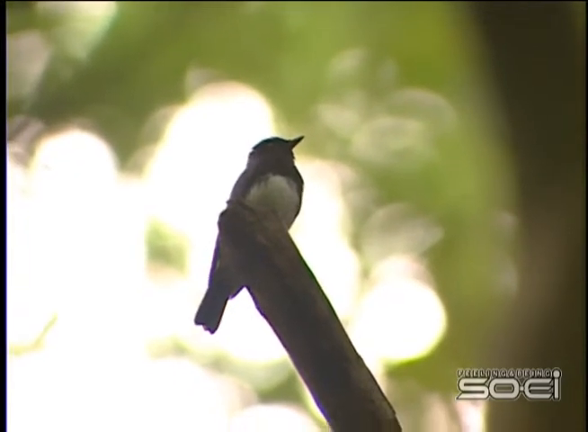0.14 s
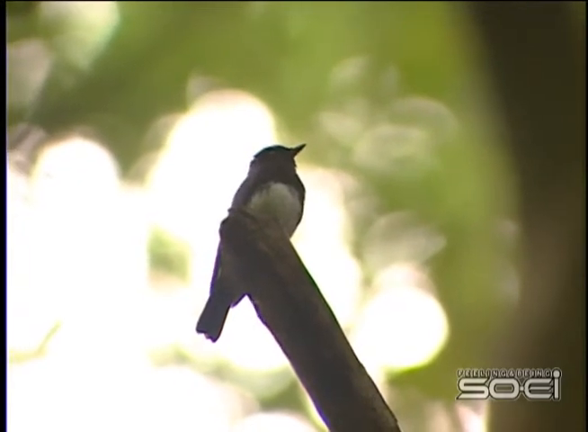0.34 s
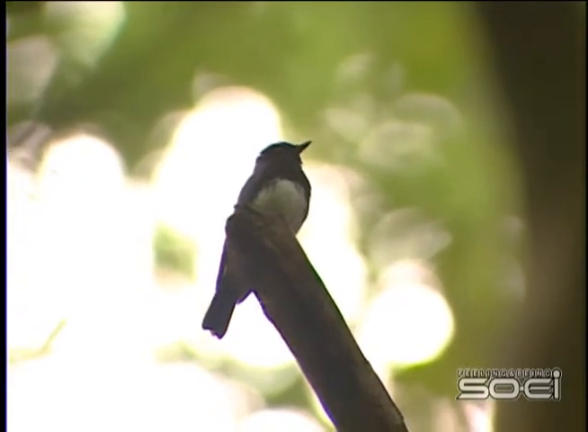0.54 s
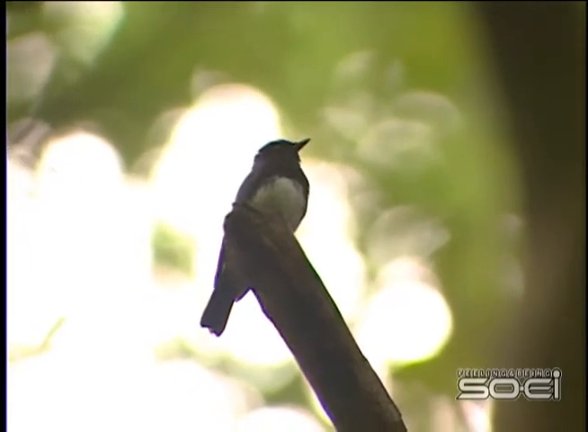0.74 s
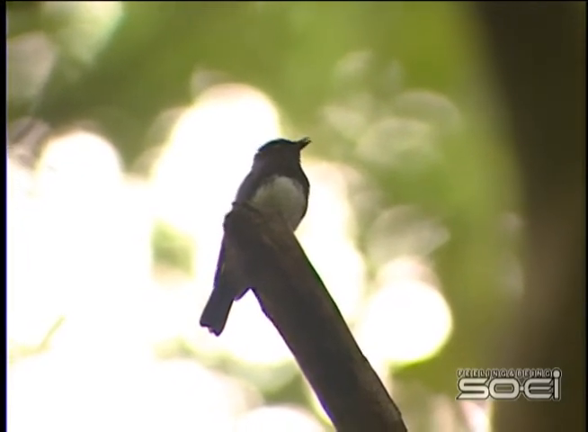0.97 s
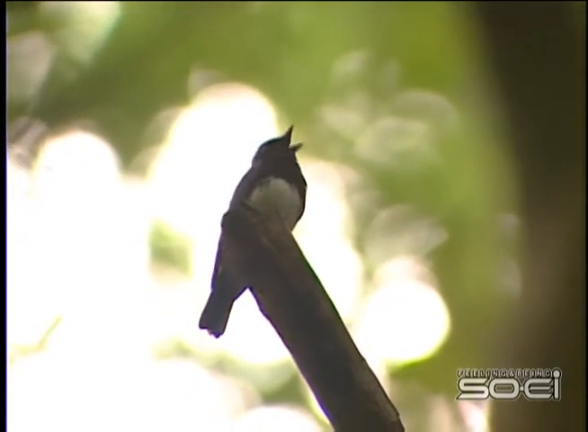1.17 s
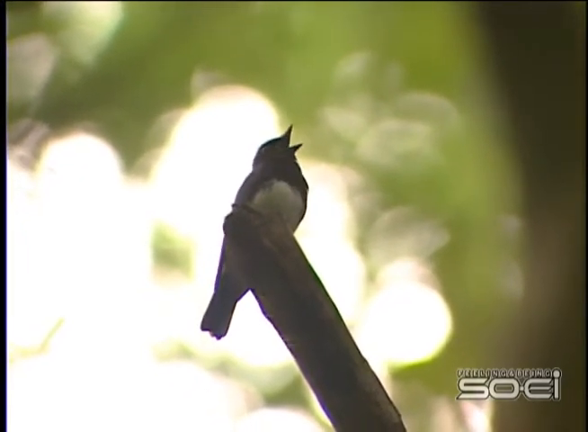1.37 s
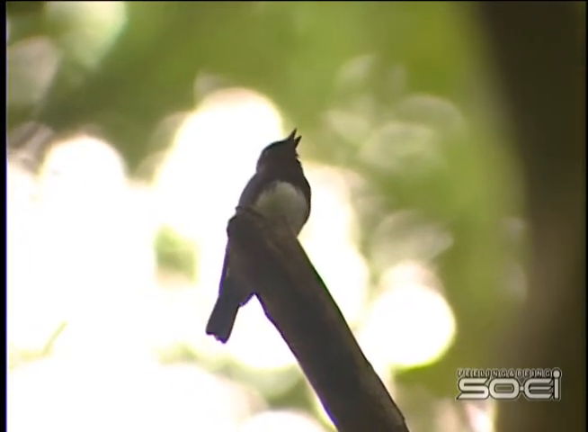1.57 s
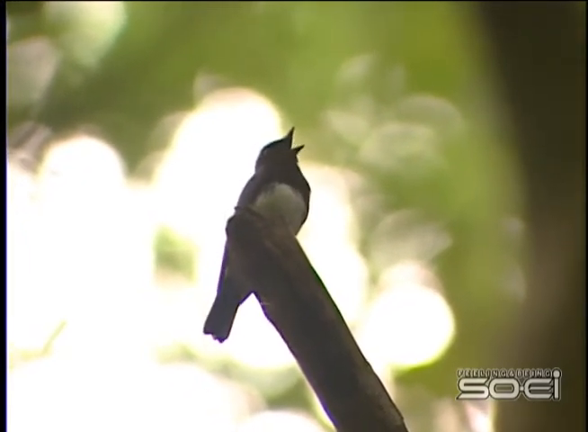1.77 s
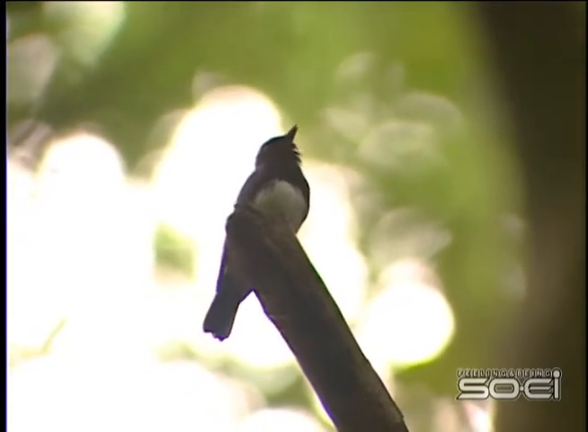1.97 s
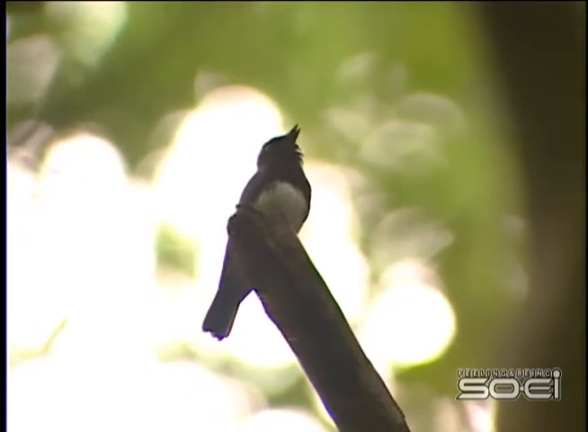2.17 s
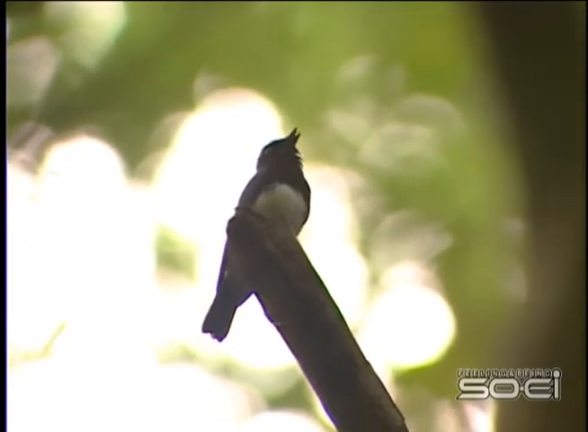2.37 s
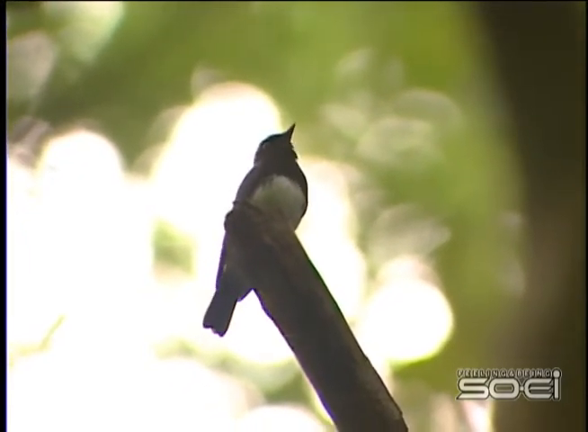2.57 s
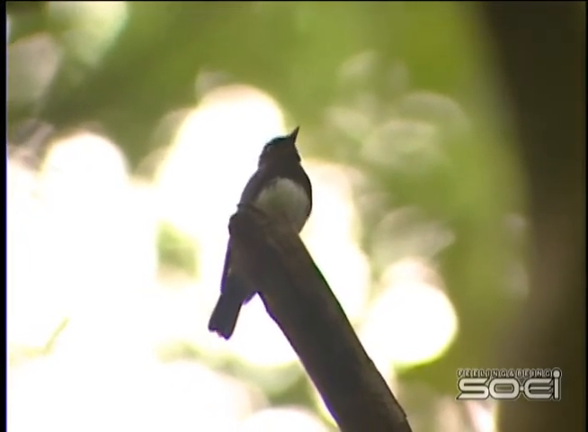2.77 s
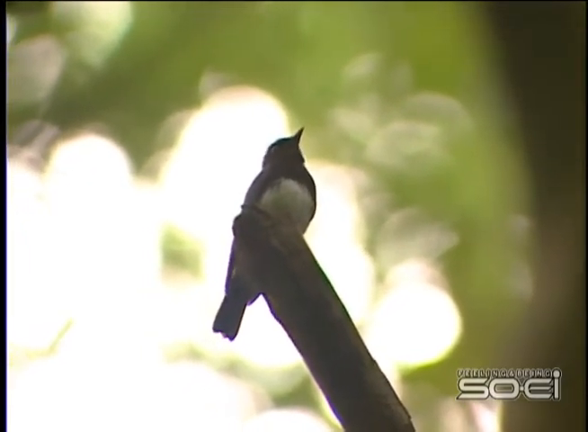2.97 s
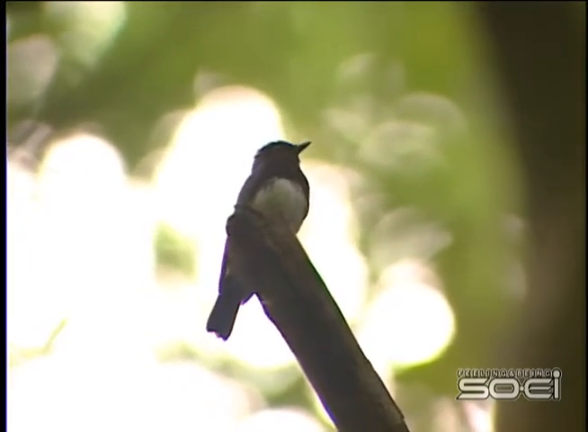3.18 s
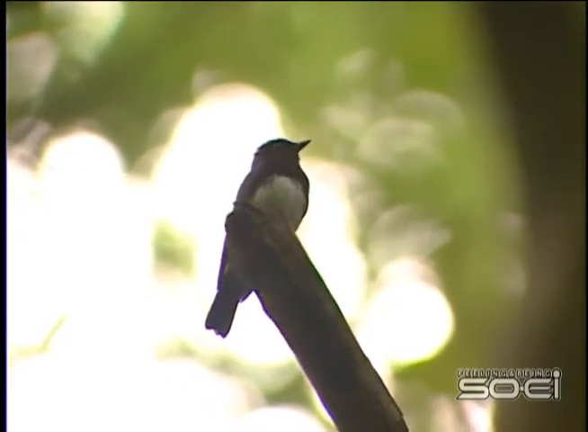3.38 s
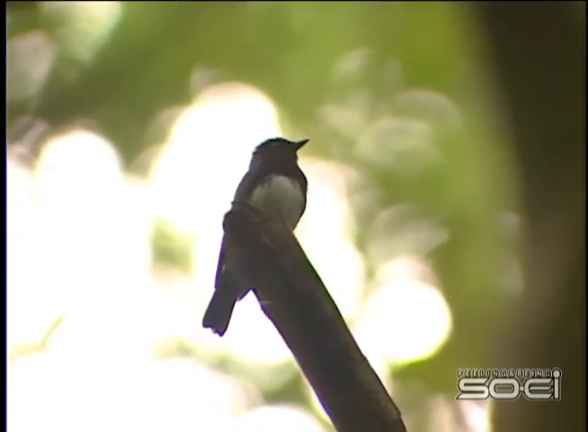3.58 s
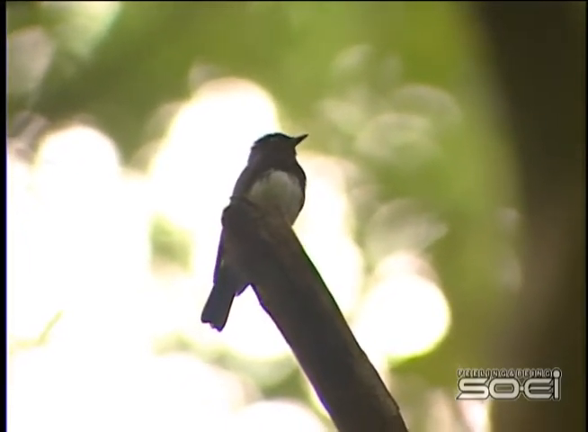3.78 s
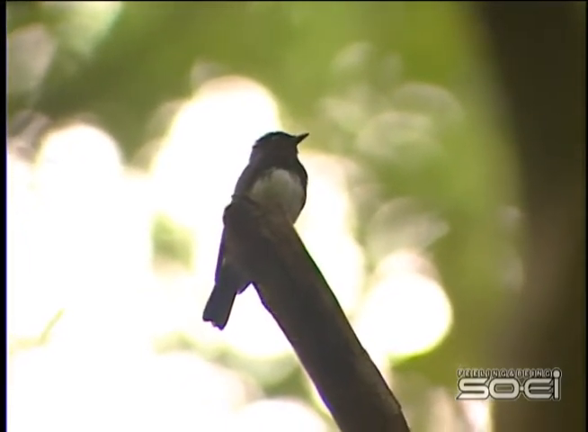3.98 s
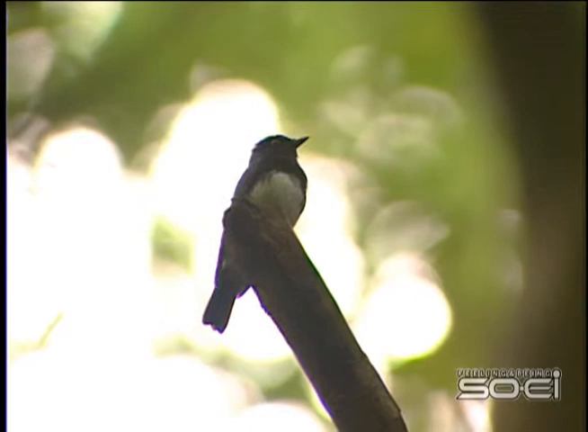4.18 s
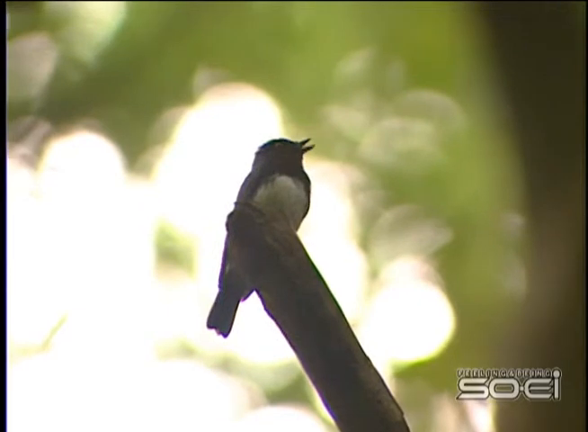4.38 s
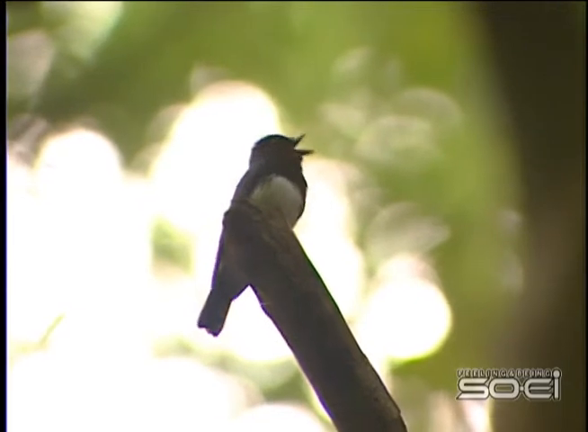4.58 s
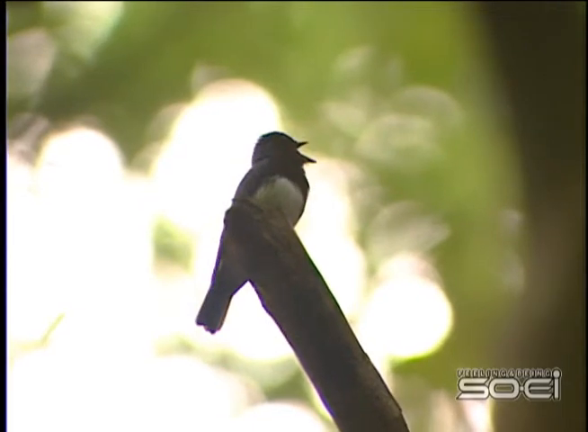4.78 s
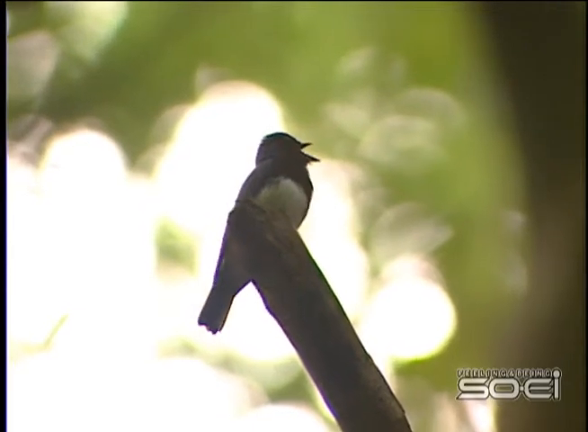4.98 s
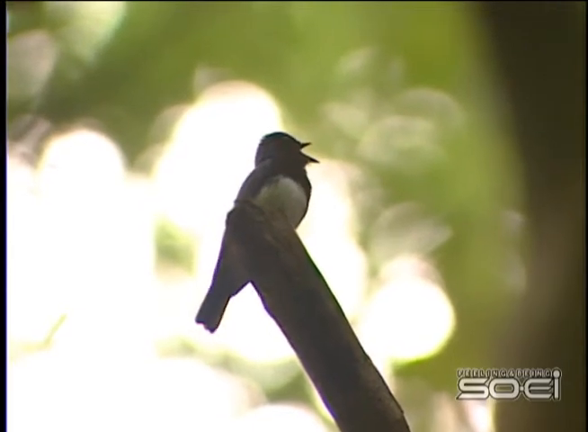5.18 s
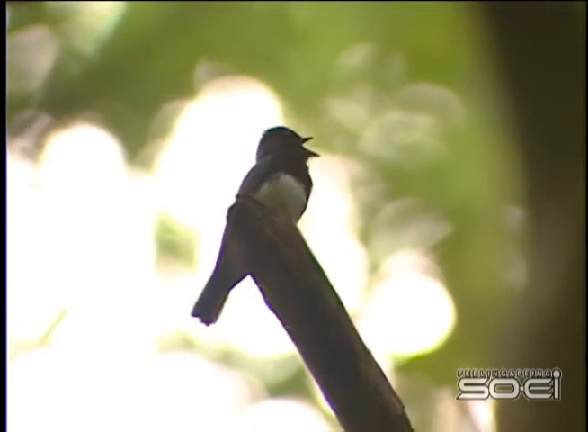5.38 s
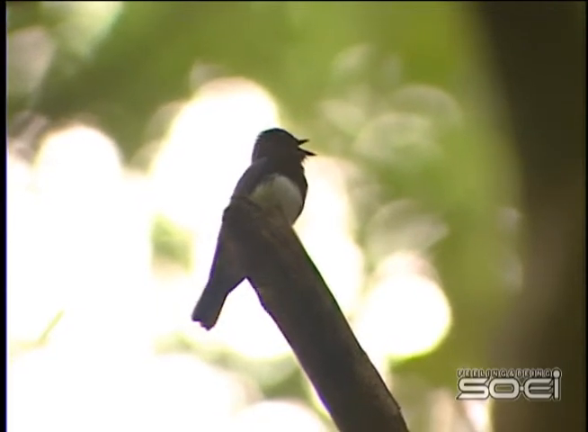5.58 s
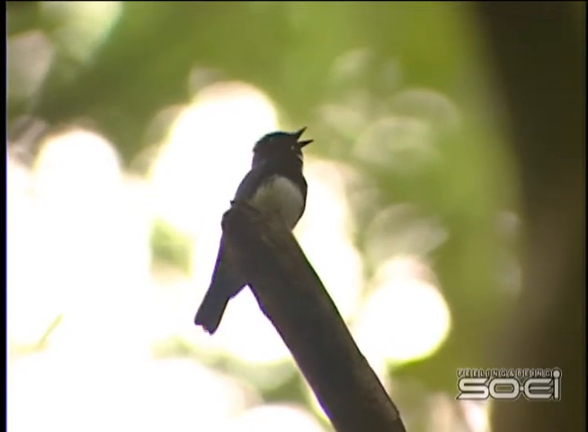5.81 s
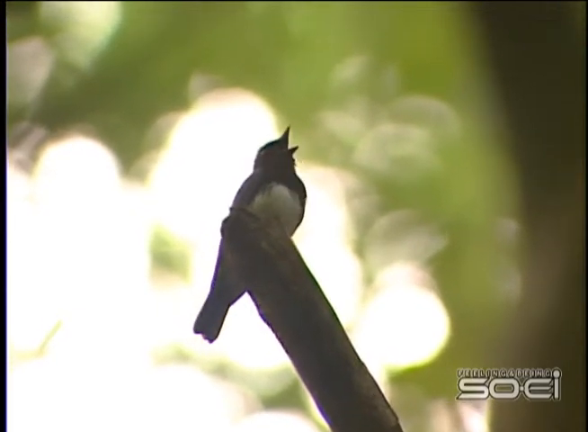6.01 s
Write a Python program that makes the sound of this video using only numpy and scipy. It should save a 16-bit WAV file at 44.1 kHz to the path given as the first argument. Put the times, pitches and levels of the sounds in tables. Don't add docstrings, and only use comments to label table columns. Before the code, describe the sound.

A small songbird sings rising slurs, a trilled warble and buzzy falling whistles in an echoing forest, over rumbling microphone thumps and soft frog clucks.

```python
import sys
import numpy as np
from scipy import signal
from scipy.fft import rfft, irfft
from scipy.io import wavfile
from scipy.ndimage import uniform_filter1d

SR = 44100
rng = np.random.default_rng(int(sys.argv[2]) if len(sys.argv) > 2 else 0)


def decibels_to_gain(level_db):
    exponent = np.asarray(level_db, float) / 20
    return 10 ** exponent


def file_out(sig):
    cols = np.atleast_2d(sig).T
    lim = np.clip(cols, -1, 1)
    pcm = np.round(lim * 32767).astype(np.int16)
    wavfile.write(sys.argv[1], SR, pcm)


N = 266672

# start_s, climb_s, foot_hz, top_hz, level_db
SLURS = [
    (1.228, 0.1, 3428, 4794, -39.5),
    (1.408, 0.066, 3628, 5286, -35.5),
    (1.558, .066, 3708, 5266, -38),
    (1.774, 0.17, 3150, 5207, -36),
]
# start_s, length_s, foot_hz, top_hz, level_db
FLICKS = [
    (1.347, .03, 3658, 5100, -32.5),
    (1.504, .033, 3795, 5170, -36),
    (1.648, 0.0206, 4680, 5315, -39),
    (2.081, 0.0266, 2346, 2783, -41),
]
# start_s, length_s, from_hz, to_hz, level_db
CHIRPS = [
    (1.327, 0.011, 4700, 3300, -38),
    (1.329, 0.015, 8000, 4830, -53),
    (1.487, 0.012, 5070, 3200, -39),
    (2.072, .015, 2750, 3760, -40.5),
    (2.092, 0.0131, 3700, 2650, -38.5),
    (2.113, 0.015, 3650, 2500, -54),
    (2.299, 0.027, 3296, 3244, -36),
]
# start_s, length_s, from_hz, to_hz, climax_level_db
WARBLE = [
    (2.175, 0.14, 2900, 3300, -33.5),
    (2.328, .172, 3200, 3100, -35),
    (2.27, 0.13, 2550, 2450, -53),
]
# start_s, pitch_hz, level_db
LEAD_IN = [
    (4.584, 4500, -53),
    (4.61, 4156, -35),
    (4.648, 3920, -33),
    (4.654, 3952, -39),
    (4.664, 4007, -29),
    (4.69, 4214, -31.5),
    (4.714, 4160, -38),
    (4.726, 3400, -53),
]
# start_s, length_s, pitch_hz, level_db, trill_depth_hz
WHISTLES = [
    (4.812, 0.16, 3790, -30, 114),
    (5.087, 0.19, 3752, -28.5, 115),
    (5.377, .205, 3628, -29.5, 130),
    (5.688, .203, 3535, -30.5, 107),
]
OVERTONES_DB = -32.5, -40, -55
# pitch_hz, gain_db
BEAK = [(5000, 8.5), (7500, -12), (9000, -6), (10500, 0), (12000, 7), (13500, 6), (16000, 2)]
# band_hz, t60_s, strength_db
FOREST = [(700, 0.98, 5.5), (2500, 0.93, 0), (3200, 0.83, -0.93), (3950, 0.94, -0.1), (5500, 0.97, 0.2),
          (8800, 0.88, 1), (13900, 0.24, 2.5)]
# start_s, peak_db, pitch_hz
CLUCKS = [(0.476, -66.5, 1080), (0.893, -57, 1040), (1.147, -53, 1024), (1.193, -51, 916),
          (1.277, -59, 970), (1.783, -55, 1320), (2.41, -50, 1090), (2.578, -52, 970), (2.739, -48.5, 897),
          (2.82, -45.5, 900), (2.882, -57, 960), (3.111, -54, 890), (3.286, -52.5, 894), (3.366, -62, 1090),
          (3.705, -57, 1075), (3.898, -56, 905), (3.965, -46, 870), (4.102, -75, 824), (4.228, -58, 1150),
          (4.251, -60, 1080), (4.477, -61, 1020), (4.531, -50, 1070), (4.762, -54, 1010), (5.169, -61, 799),
          (5.235, -47, 776), (5.518, -55, 940), (5.756, -54, 1090), (5.788, -54, 870), (5.886, -53, 840),
          (6.005, -53, 830)]
# band_hz, level_db_per_hz
LEAVES = [(120, -7), (200, 0.5), (304, -5.5), (334, -5.5), (745, -10.5), (895, -8), (1200, -10.5),
          (1630, -8.5), (2530, -12), (4980, -12), (14900, -25.5), (15800, -32)]
# time_s, level_db
SHAKE = [(0, -62), (.15, -60), (.45, -53), (.75, -47), (1.1, -39), (1.5, -38), (1.85, -45), (2.35, -41.5),
         (2.75, -42.5), (3.4, -45), (3.75, -38.5), (4.0, -44), (4.3, -48.5), (4.55, -40), (4.8, -47.5),
         (5.5, -45), (6.05, -41)]
# peak_s, deep_db, upper_db, s to die by 20 dB
LURCHES = [(0.0, -48, -59, 0.3), (.53, -49.5, -58, 0.8), (.71, -36, -58, 0.07), (.89, -34.5, -40, .15),
           (1.18, -33, -50, 0.04), (1.281, -31, -47.5, .2), (1.41, -28, -50, 0.12), (1.579, -31, -53, 0.18),
           (2.0, -23.5, -52, 0.2), (2.236, -42, -34.5, 0.2), (2.259, -25.5, -44, 0.27),
           (2.461, -33.5, -56, 0.03), (2.542, -38, -49.5, 0.26), (3.1, -40.5, -51, 0.25),
           (3.15, -47, -56, 0.35), (3.43, -55, -53, 0.3), (3.57, -35, -51, 0.05), (3.67, -32, -55, 0.14),
           (3.909, -36, -56, 0.02), (4.056, -32.5, -26.5, 0.13), (4.11, -24.5, -57, .12),
           (4.154, -40, -38.5, 0.05), (4.511, -34, -58, 0.11), (4.7, -37.5, -61, 0), (4.849, -54, -58, 0.6),
           (5.2, -41.5, -60, 0.2), (5.61, -40, -59, 0.5), (6.045, -40, -33, 2)]
# band_hz, level_db_per_hz
DEEP_RUMBLE = [(18, -5), (27, -4), (36, 6), (46, -3), (58, 1.5), (70, -11), (90, -24)]
# band_hz, level_db_per_hz
UPPER_RUMBLE = [(41, -39.5), (70, 1.5), (86, -2.5), (134, -3), (161, -18), (320, -41.5), (420, -68),
                (700, -120)]
# start_s, peak_db, ring_hz, t60_s
KNOCKS = [
    (0.54, -55, 282, 0.025),
    (0.855, -53, 215, 0.025),
    (0.893, -36, 396, 0.035),
    (0.907, -40, 202, 0.028),
    (0.92, -42, 210, 0.025),
    (1.969, -55, 205, 0.025),
    (2.218, -68, 199, 0.025),
    (4.043, -54, 202, 0.02),
    (4.152, -29, 212, 0.025),
    (6.032, -42, 206, 0.025),
]
# start_s, peak_db, ring_hz, t60_s
JOLTS = [
    (1.919, -26, 51, 0.26),
    (1.975, -22.5, 87, 0.15),
    (1.99, -19.5, 61.8, 0.27),
    (2.225, -27.5, 92, 0.22),
    (2.27, -28.5, 34.7, 0.64),
    (4.047, -26.5, 50.8, 0.23),
    (4.057, -16, 32.2, 0.31),
    (4.503, -30.5, 56, 0.47),
]
# start_s, peak_db, ring_hz, t60_s
CREAKS = [(0.542, -57, 400, 0.047), (0.574, -64, 390, 0.046), (0.608, -75, 382, 0.05),
          (0.679, -74, 382, 0.05), (0.855, -57, 490, 0.062), (0.925, -59, 382, 0.05),
          (0.969, -72, 382, 0.046), (2.22, -53, 502, 0.059), (2.282, -53.5, 486, 0.05),
          (2.314, -60, 380, 0.054), (4.037, -50, 408, 0.077), (4.623, -59, 464, 0.05)]
# start_s, peak_db, centre_hz, t60_s
TICKS = [
    (0.3451, -60, 5500.0, 0.003),
    (1.7661, -60, 5500.0, 0.003),
    (2.4603, -46, 5500.0, 0.0067),
    (3.9644, -67, 5500.0, 0.003),
    (4.103, -48, 5500.0, 0.002),
    (4.29, -60, 5500.0, 0.003),
    (5.5503, -62, 5500.0, 0.0037),
]
# start_s, peak_db, centre_hz, t60_s
SNAPS = [
    (0.5407, -55, 2330, 0.0022),
    (0.6394, -64, 2300.0, 0.003),
    (0.894, -58, 2300.0, 0.003),
    (0.9744, -69, 2300.0, 0.003),
    (3.9644, -58, 2300.0, 0.003),
    (4.1016, -58, 2300.0, 0.003),
]
# band_hz, level_db_per_hz
SELF_NOISE = [(600, -2), (3000, -13), (8000, -19.5), (12000, -6), (15700, 3)]
# band_hz, level_db_per_hz
IDLE_NOISE = [(20, -17), (100, -9.5), (300, -16.5), (1200, -21), (3000, -25), (8000, -34), (15500, -49)]


def sing(notes, trill_per_s=50, uneven=0.074, waver_hz=12, flutter_db=3.0, dip_db=1.3, thinning=0.3):
    out = np.zeros(N)
    for note in notes:
        s, pitch_hz, level_db, *depth_hz = np.transpose(note)
        at = np.arange(int(s[0] * SR), min(int(s[-1] * SR), N))
        t = at / SR
        rate = trill_per_s * (1 + uneven * drift(24.4, len(t)))
        beat = np.sin(2 * np.pi * np.cumsum(rate) / SR)
        swing_hz = np.interp(t, s, depth_hz[0]) * beat if depth_hz else 0
        hz = np.interp(t, s, pitch_hz) + swing_hz + waver_hz * drift(117.5, len(t))
        phase = 2 * np.pi * np.cumsum(hz) / SR
        effort_db = np.interp(t, s, level_db)
        edge = np.clip(np.minimum(t - s[0], s[-1] - t) / 0.002, 0, 1)
        height = np.sqrt(2) * edge * decibels_to_gain(effort_db + flutter_db * drift(84, len(t)) - dip_db * beat ** 2)
        tone = np.sin(phase)
        thin_db = -thinning * (effort_db + 32.0)
        for k, overtone_db in enumerate(OVERTONES_DB, start=2):
            gain = decibels_to_gain(overtone_db + thin_db + at_hz(BEAK, k * hz))
            tone = tone + gain * np.sin(k * phase) * (k * hz < SR / 2)
        out[at] += height * tone
    return out


def slur(s, climb, foot_hz, top_hz, db, bend=0.71, attack_s=0.014, soft_db=-16):
    t = np.linspace(0, climb, num=12)
    hz = foot_hz + (top_hz - foot_hz) * (t / climb) ** bend
    level_db = db + soft_db * np.maximum(1 - t / attack_s, 0)
    level_db += 94 * (0.11 - climb) * (t / climb - .5)
    crest = (s + climb + 0.014, top_hz - 200, level_db[-1] + 3)
    return np.r_[np.c_[s + t, hz, level_db], [crest]]


def flick(s, length, foot_hz, top_hz, db, rise=0.359, feet_db=-13.5):
    end_hz = foot_hz - 0.256 * (top_hz - foot_hz)
    return [(s, foot_hz, db + feet_db), (s + rise * length, top_hz, db), (s + length, end_hz, db + feet_db)]


def chirp(s, length, from_hz, to_hz, db, best_hz=5040, loss_db_per_khz=5.5):
    off_khz = np.abs(np.array([from_hz, to_hz]) - best_hz) / 1000
    return np.c_[[s, s + length], [from_hz, to_hz], db - loss_db_per_khz * (off_khz - off_khz.min())]


def warble(s, length, from_hz, to_hz, db, climax_s=2.319, fade_db_per_s=140, depth_hz=272):
    t = np.linspace(s, s + length, num=9)
    level_db = db - fade_db_per_s * np.abs(t - climax_s)
    return np.c_[t, np.linspace(from_hz, to_hz, num=9), level_db, depth_hz + 0 * t]


def whistle(s, length, hz, db, depth_hz, hook_s=0.014, dive_s=0.014):
    t = np.linspace(0, length - hook_s, num=12)
    u, attack = t / t[-1], np.minimum(t / 0.04, 1)
    creep_hz = hz + 1200 * t[-1] * u ** 1.7
    level_db = db - 16 * (1 - attack) ** 2 + 3 * (u - .5)
    buzz = np.c_[s + t, creep_hz, level_db, depth_hz * (2 + attack) / 3]
    hook = (s + length, creep_hz[-1] + 140.5, db + 5, 0.29 * depth_hz)
    plunge = (s + length + dive_s, 2650, db - 31, 0)
    return np.r_[buzz, [hook, plunge]]


def flycatcher():
    plain = [slur(*row) for row in SLURS] + [flick(*row) for row in FLICKS] + [chirp(*row) for row in CHIRPS]
    lead_in = [(*row, 22) for row in LEAD_IN]
    buzzy = [lead_in] + [whistle(*row) for row in WHISTLES]
    song = sing(plain)
    song += sing(buzzy, 99, uneven=0.02, waver_hz=13.0, flutter_db=2.5, dip_db=1.5, thinning=-0.24)
    song += sing([warble(*row) for row in WARBLE], 100, uneven=0.2, waver_hz=70, flutter_db=4.0, dip_db=3.5)
    return song


def forest(song, level_db=5.5, rise_s=0.018, near_db=6.5, near_t60_s=0.19):
    t, tail = np.arange(SR * 3 // 2) / SR, 0
    white = rng.standard_normal(len(t))
    edges = 500 * 2 ** np.arange(0, 5.1, .5)
    table = np.array(FOREST)
    for low, high in zip(edges, edges[1:]):
        band = signal.sosfilt(signal.butter(2, [low, high], "band", fs=SR, output="sos"), white)
        centre_hz = np.sqrt(low * high)
        t60, strength_db = at_hz(table, centre_hz), at_hz(table[:, ::2], centre_hz)
        tail = tail + band * decibels_to_gain(strength_db) * (decibels_to_gain(-60 * t / t60) + decibels_to_gain(near_db - 60 * t / near_t60_s))
    tail = tail * (1 - np.exp(-t / rise_s)) * decibels_to_gain(drift(44, len(t)))
    return song + decibels_to_gain(level_db) * signal.fftconvolve(song, tail / np.sqrt(.06 * SR))[:N]


def frogs(swell_s=0.0035, fall=0.048, count=130):
    out, t = np.zeros(N + SR), np.arange(SR // 12) / SR
    shape = t / swell_s * np.exp(1 - t / swell_s)
    luck = rng.random((count, 3))
    far = np.c_[1.15 + 4.85 * luck[:, 0], -65 + 8 * luck[:, 1] ** 2, 800 + 600 * luck[:, 2] ** 2]
    for s, peak_db, hz in np.r_[CLUCKS, far]:
        tone = np.sin(2 * np.pi * np.cumsum(hz * (1 + fall - fall * t / 0.0069)) / SR)
        start = round(s * SR)
        out[start:start + len(t)] += decibels_to_gain(peak_db - 2.0) * shape * tone
    return out[:N]


def shaking():
    now, t = np.arange(N) / SR, np.arange(0, N, 64) / SR
    steady_db = np.interp(now, *np.transpose(SHAKE))
    s, deep_db, upper_db, dies = np.transpose(LURCHES)[:, :, None]
    loss_db = np.maximum(20 * (t - s) / dies, 500 * (s - t))
    sudden_db = np.maximum(1.55 * loss_db, 1500 * (s - t))
    deep = np.interp(now, t, decibels_to_gain(deep_db - loss_db).sum(axis=0))
    upper = np.interp(now, t, decibels_to_gain(upper_db - sudden_db).sum(axis=0))
    deep = np.hypot(deep, decibels_to_gain(steady_db))
    upper = np.hypot(upper, decibels_to_gain(-60 + 1.12 * (steady_db + 44)))
    return deep * evened(coloured(DEEP_RUMBLE), 0.0604) + upper * evened(coloured(UPPER_RUMBLE), .07)


def evened(x, span_s):
    return x / np.sqrt(uniform_filter1d(x ** 2, round(span_s * SR)) + 0.1)


def taps(events, soft_hz, gain_db):
    out, span = np.zeros(N + SR), SR // 3
    click = signal.lfilter(*signal.butter(2, soft_hz, fs=SR), np.eye(1, span)[0])
    for s, peak_db, hz, t60 in events:
        sound = ring(click, hz, t60)
        start = round(s * SR)
        out[start:start + span] += decibels_to_gain(peak_db + gain_db) * sound / np.abs(sound).max()
    return out[:N]


def ring(clicks, hz, t60):
    r, w = decibels_to_gain(-60 / (t60 * SR)), 2 * np.pi * hz / SR
    return signal.lfilter([0, np.sin(w)], [1, -2 * r * np.cos(w), r * r], clicks)


def handling():
    bumps = taps(KNOCKS, soft_hz=800, gain_db=3.5) + taps(JOLTS, soft_hz=295, gain_db=-1.5)
    bumps += taps(CREAKS, soft_hz=250, gain_db=4.5) + taps(TICKS, soft_hz=9000, gain_db=2.5)
    return bumps + taps(SNAPS, soft_hz=4000, gain_db=1.5)


def air(song):
    t = np.arange(N) / SR
    shut = .5 - .5 * np.tanh((t - 0.97) / 0.16)
    ringing = np.sqrt(np.abs(uniform_filter1d(song ** 2, round(0.14 * SR))))
    lift_db = 5 * ringing / (ringing + decibels_to_gain(-43.5))
    stream_db = -71 - 15 * shut + 0.383 * t
    leaves_db = -77 - 15.5 * shut + lift_db
    hiss = coloured(LEAVES)
    stream = signal.sosfiltfilt(signal.butter(1, 2600, fs=SR, output="sos"), hiss)
    far = decibels_to_gain(stream_db + 10.0 + 1.53 * drift(4.8, N)) * stream
    return far + decibels_to_gain(leaves_db + 13.0 + 1.85 * drift(13, N)) * (hiss - stream)


def coloured(spectrum):
    hz = np.arange(N // 2 + 1) * SR / N
    inside = (hz > spectrum[0][0]) & (hz < spectrum[-1][0])
    x = irfft(rfft(rng.standard_normal(N)) * decibels_to_gain(at_hz(spectrum, hz)) * inside, N)
    return x / x.std()


def drift(rate, size):
    r = np.exp(-2 * np.pi * rate / SR)
    slow = signal.lfilter([1], [1, -2 * r, r * r], rng.standard_normal(size + SR))
    return (slow[SR:] - slow[SR:].mean()) / slow[SR // 2:].std()


def at_hz(points, hz):
    points = np.array(points)
    return np.interp(np.log(np.maximum(hz, 1)), np.log(points[:, 0]), points[:, 1])


def scene():
    rung = forest(flycatcher())
    heard = rung + frogs() + air(rung) + shaking() + handling()
    left = 2 * heard + decibels_to_gain(-79.5) * coloured(SELF_NOISE)
    right = decibels_to_gain(-76.5) * coloured(IDLE_NOISE)
    return np.array([left, right])


def roll_off(x):
    return signal.sosfilt(signal.butter(12, 15900, fs=SR, output="sos"), x)


def record(dry):
    level_db = 10 * np.log10(uniform_filter1d(dry[0] ** 2, round(0.011 * SR)) + 1e-12)
    duck = decibels_to_gain(-.6 * np.maximum(level_db + 18.5, 0))
    mix = signal.sosfilt(signal.ellip(12, .5, 60, 15840, fs=SR, output="sos"), dry * duck)
    mix = mix * np.clip((N - np.arange(N)) / (.004 * SR), 0, 1)
    return roll_off(mix)


dry = scene()
out = record(dry)
file_out(out)
```